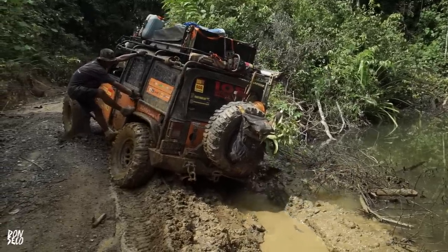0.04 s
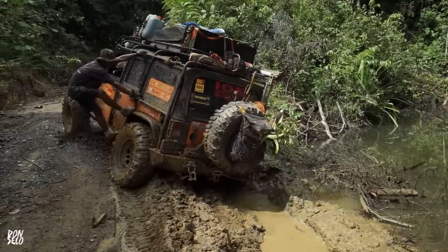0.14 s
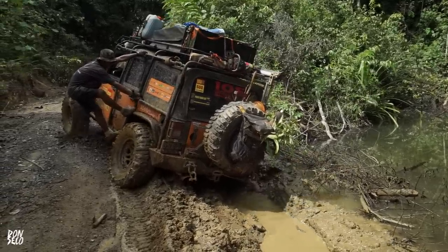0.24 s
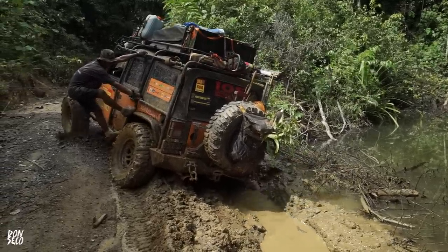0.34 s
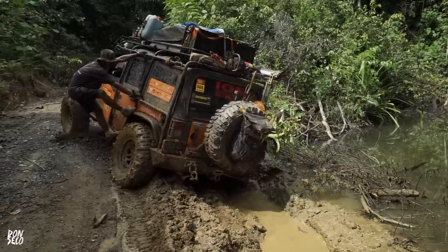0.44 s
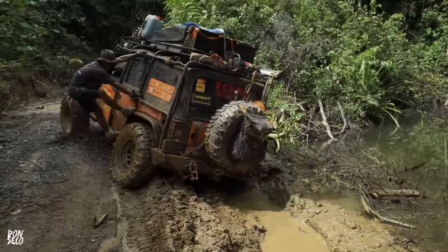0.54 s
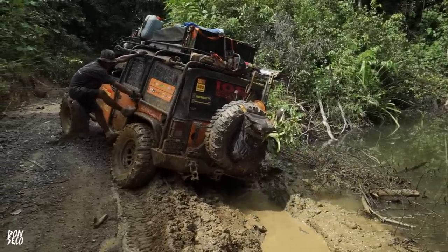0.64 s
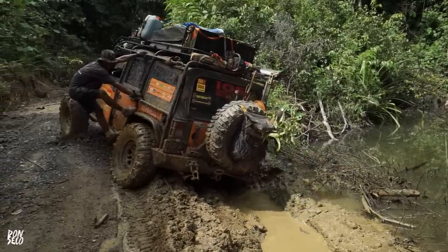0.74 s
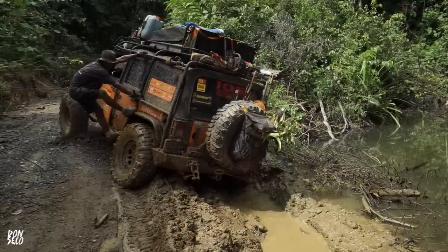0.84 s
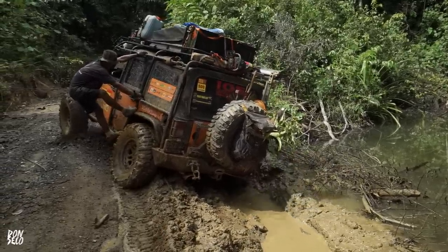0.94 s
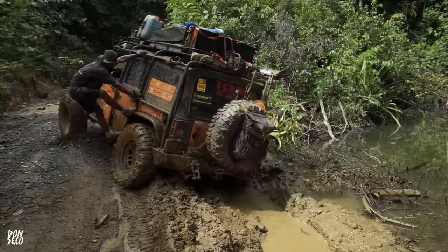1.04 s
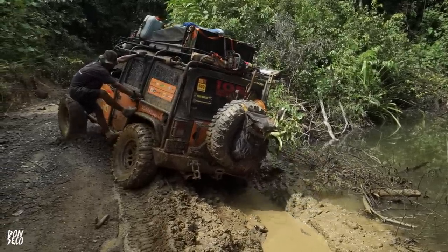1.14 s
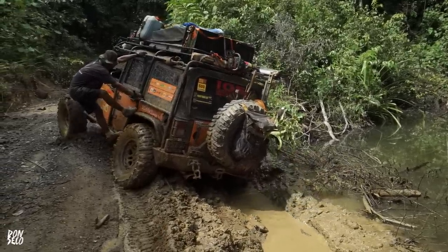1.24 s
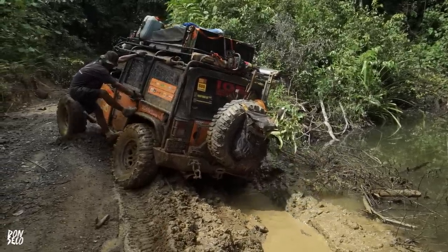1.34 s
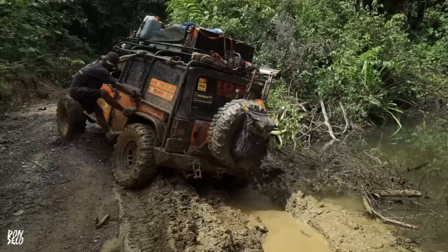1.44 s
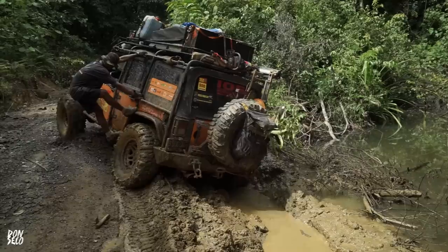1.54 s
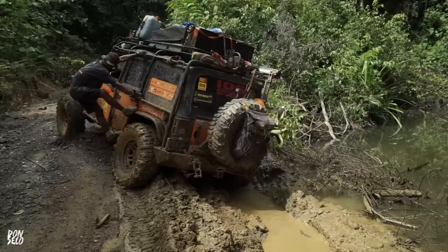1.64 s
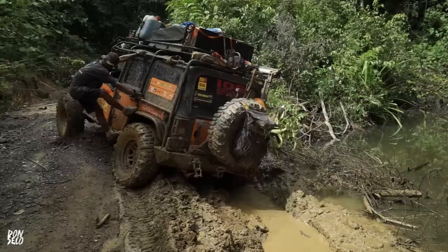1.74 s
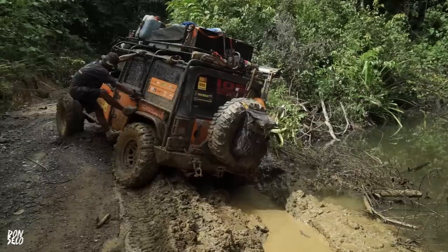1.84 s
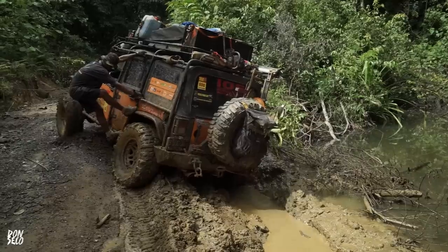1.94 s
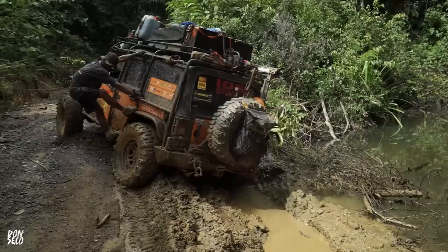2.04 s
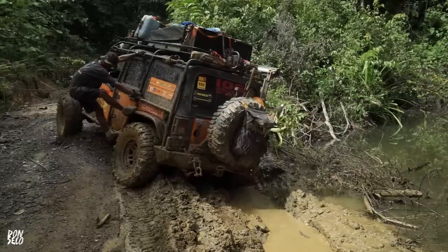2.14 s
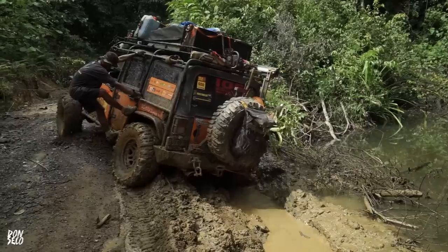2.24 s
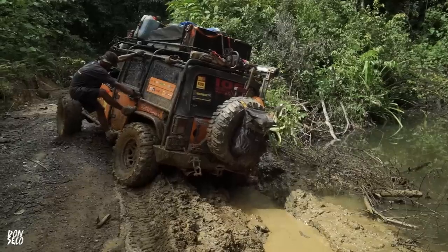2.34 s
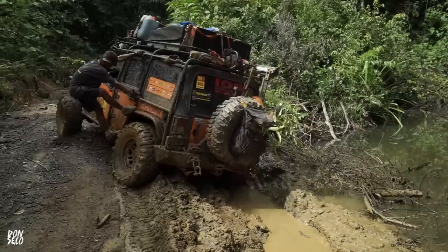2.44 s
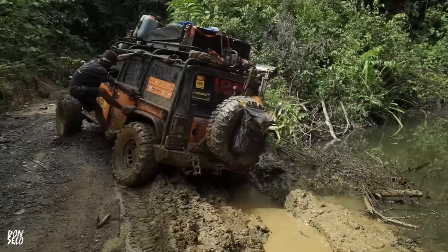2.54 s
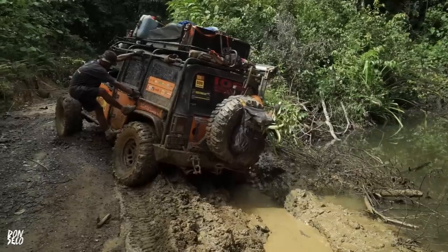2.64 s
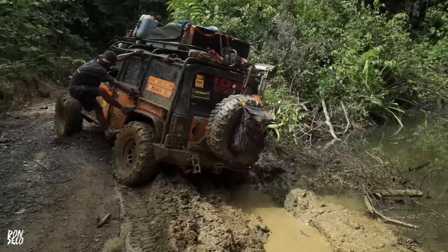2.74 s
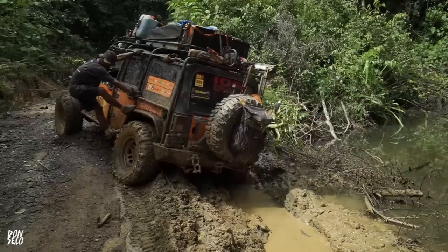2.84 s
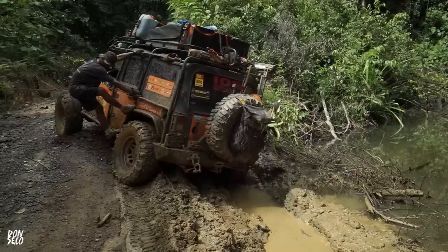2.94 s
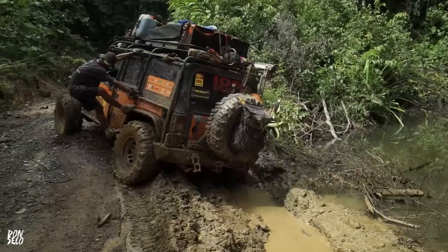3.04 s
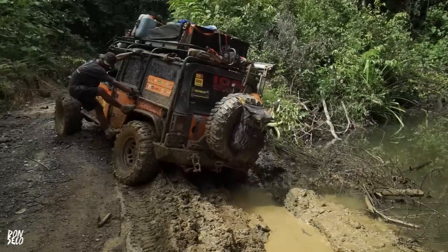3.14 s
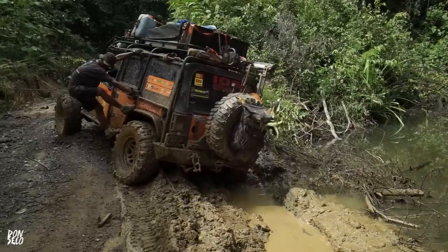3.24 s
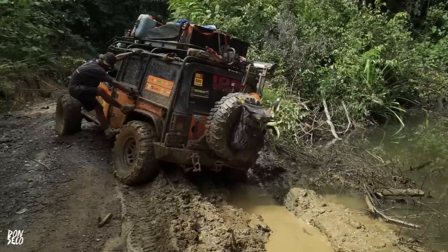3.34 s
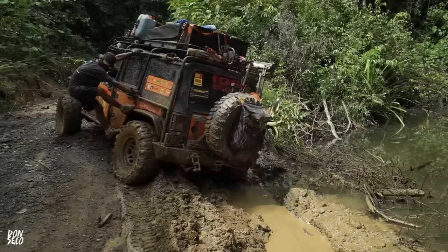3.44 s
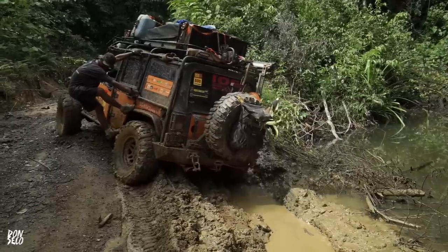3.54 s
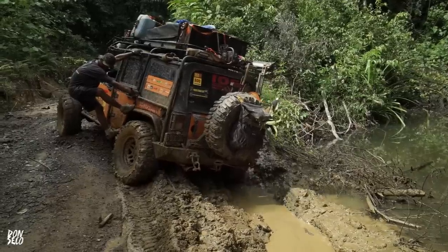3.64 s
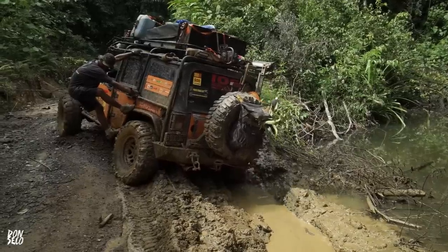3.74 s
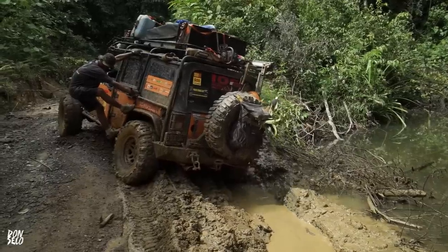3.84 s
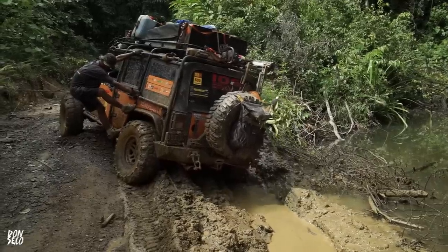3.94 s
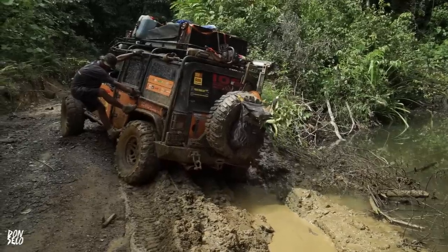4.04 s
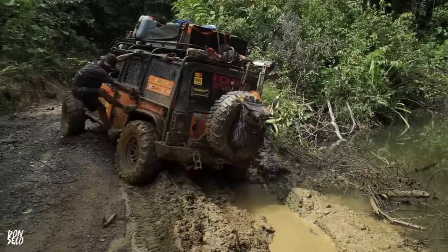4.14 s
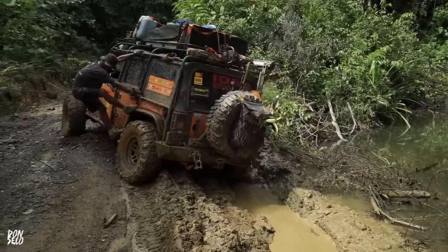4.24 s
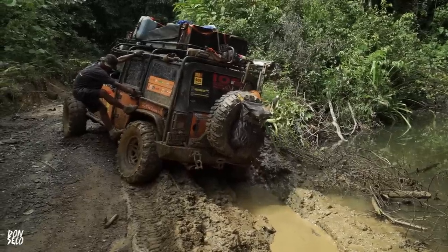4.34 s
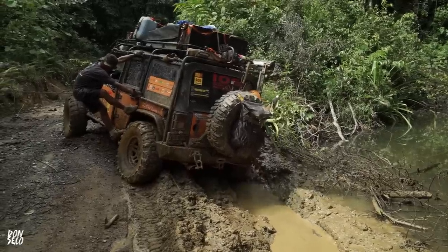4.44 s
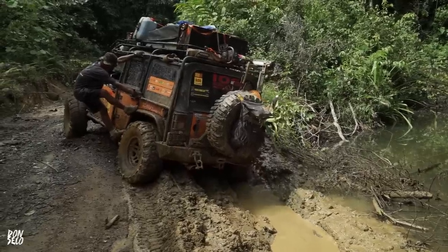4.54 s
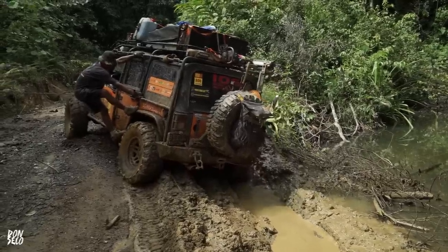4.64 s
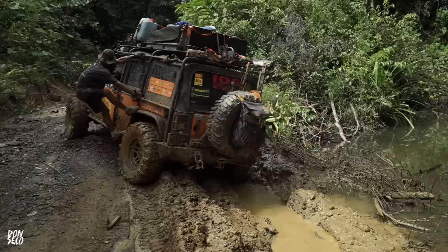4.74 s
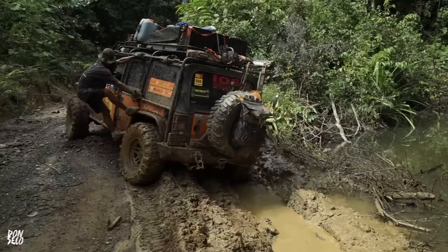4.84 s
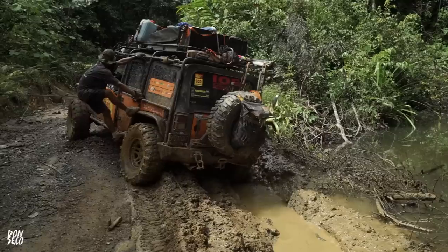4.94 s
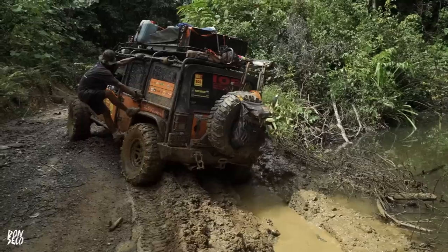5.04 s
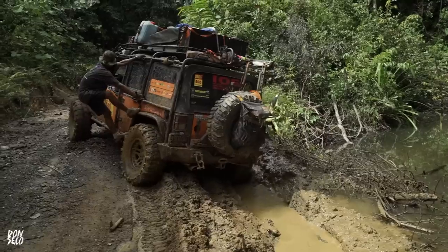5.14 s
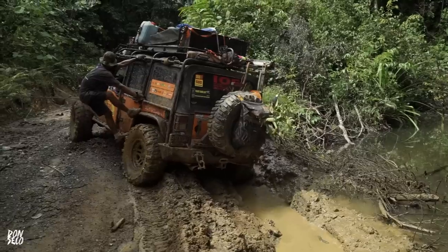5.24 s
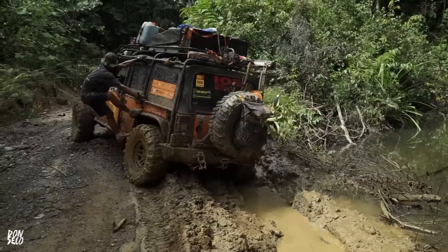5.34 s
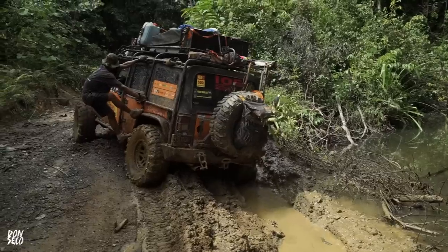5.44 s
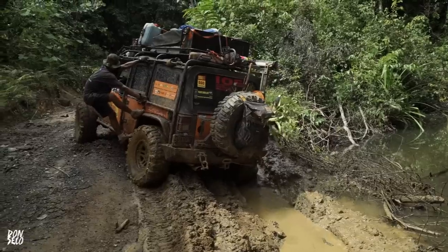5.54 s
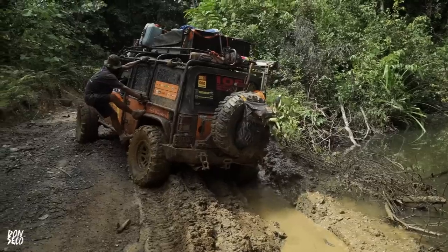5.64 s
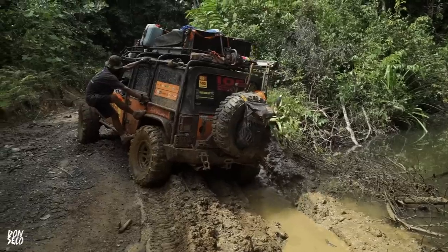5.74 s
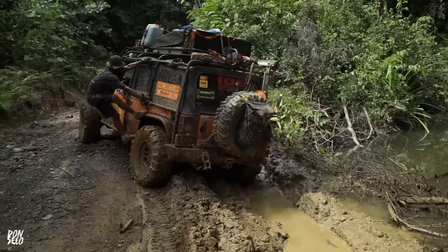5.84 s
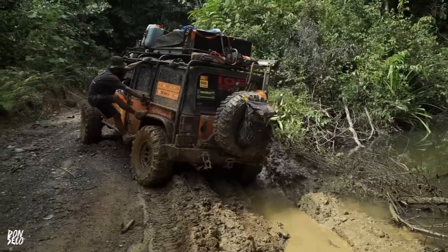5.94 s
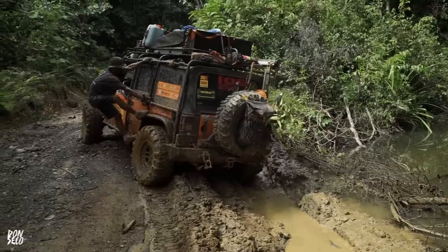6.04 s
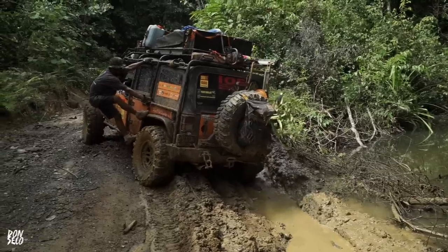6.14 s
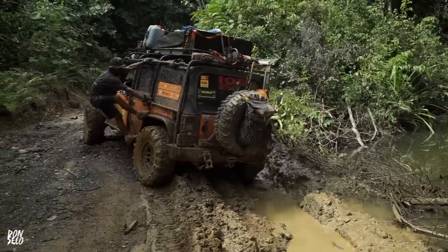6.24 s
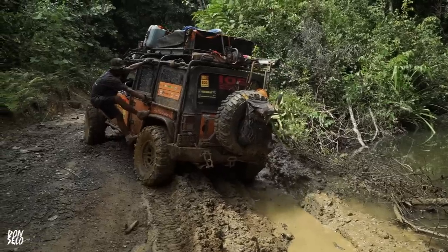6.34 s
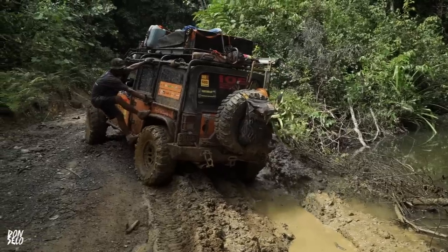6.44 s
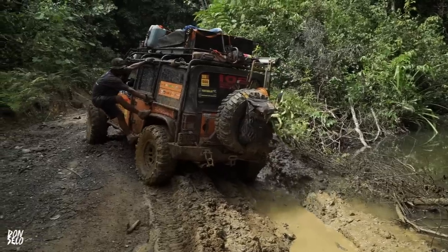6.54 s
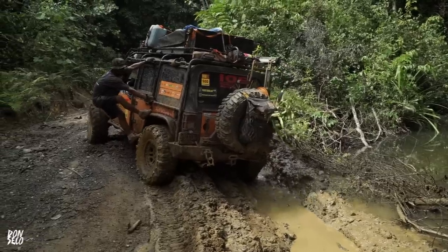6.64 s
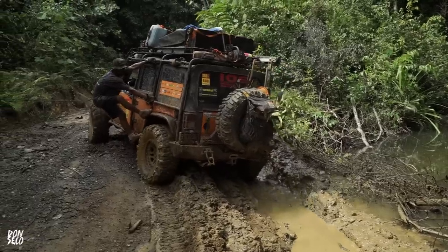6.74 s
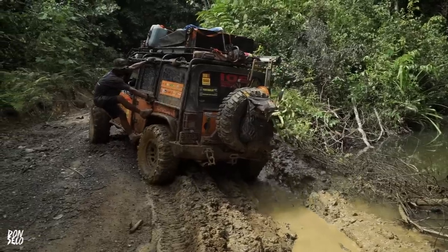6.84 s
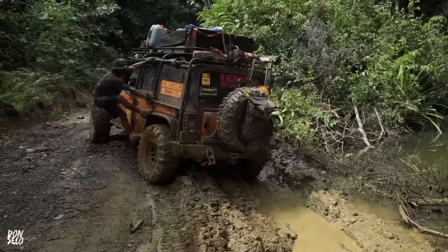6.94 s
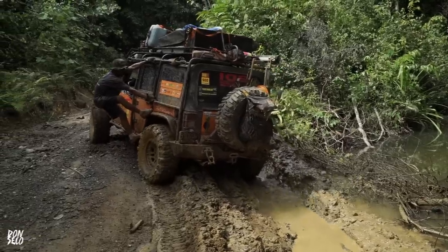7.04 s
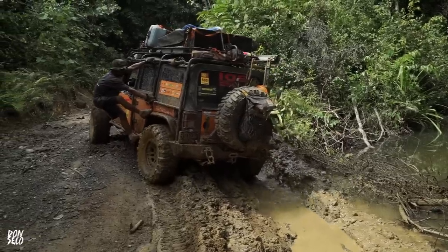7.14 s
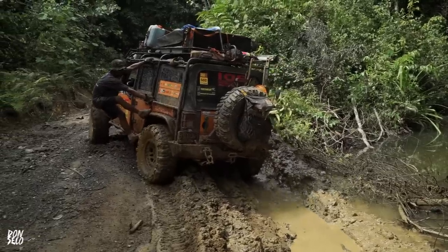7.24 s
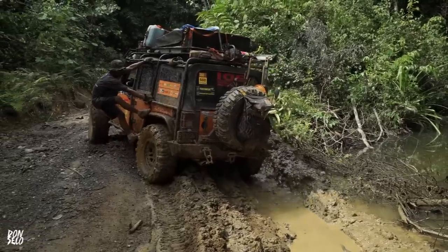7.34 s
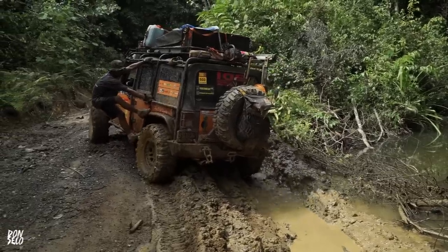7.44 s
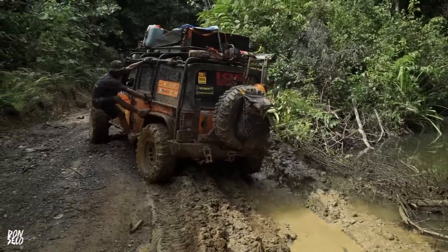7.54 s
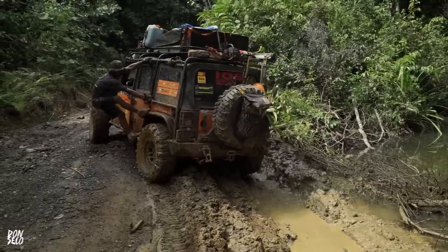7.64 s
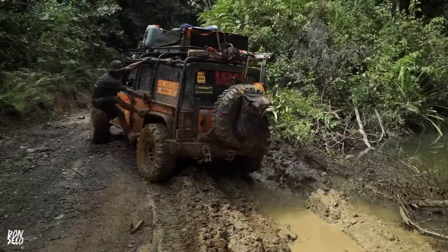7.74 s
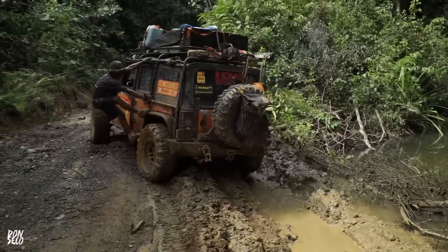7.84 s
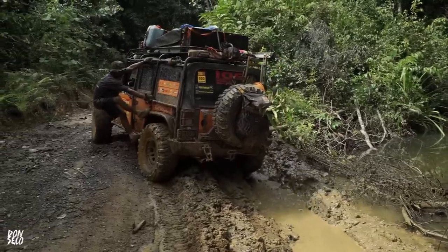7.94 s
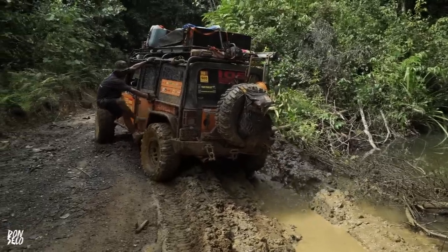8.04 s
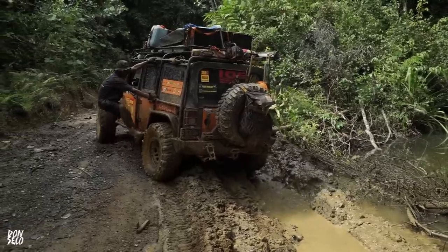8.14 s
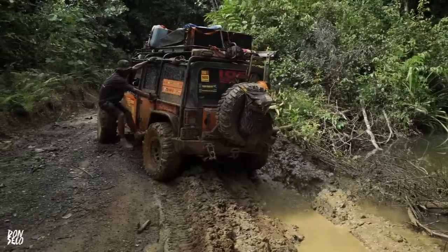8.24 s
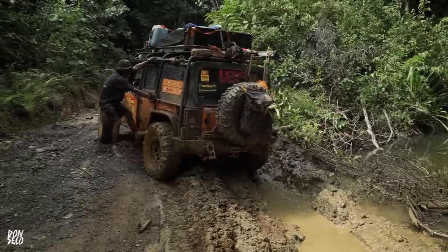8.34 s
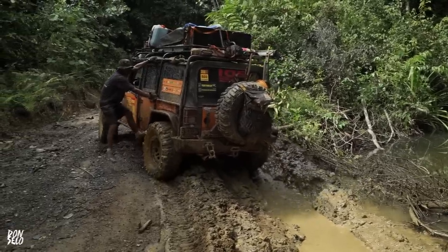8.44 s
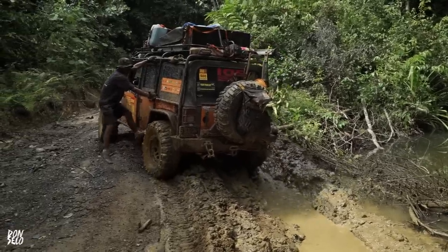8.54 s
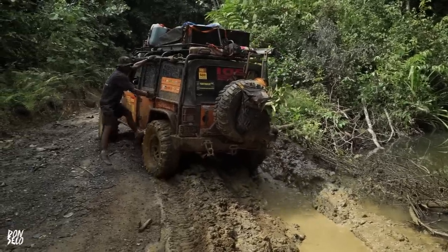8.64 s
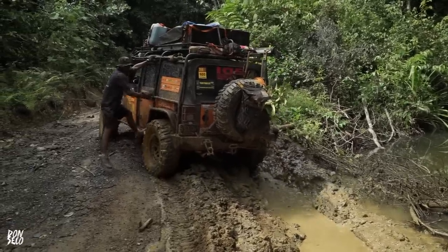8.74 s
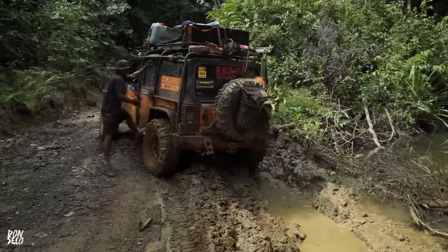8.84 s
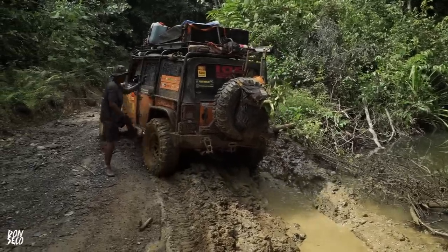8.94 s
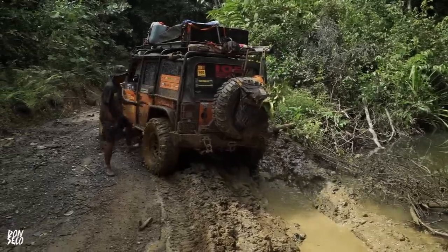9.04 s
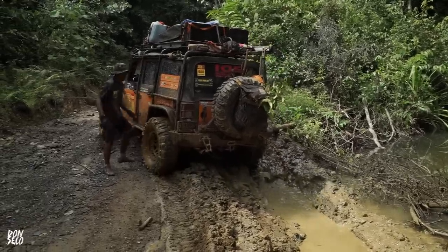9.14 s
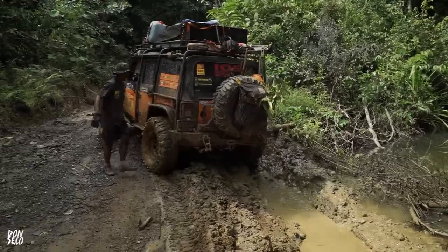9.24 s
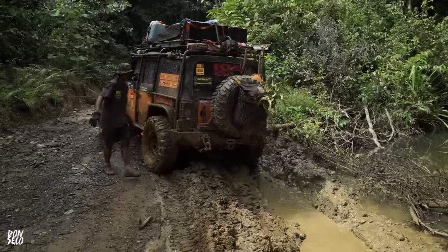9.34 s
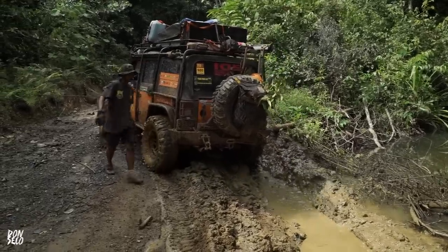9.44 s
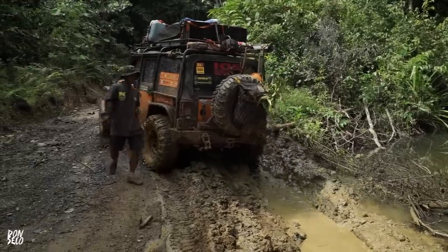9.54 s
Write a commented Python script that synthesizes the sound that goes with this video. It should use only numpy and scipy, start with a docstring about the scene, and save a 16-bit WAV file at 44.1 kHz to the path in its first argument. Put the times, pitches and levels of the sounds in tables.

```python
"""A six-cylinder four-wheel-drive crawls out of a mud rut on a jungle track, heard from behind.
The engine races, sags as the wheels dig in, pulls again and runs down. Its speed and load steer a sum of
sine waves, shaped by the exhaust pipe's resonances, and filtered noise for the rushing gas and a wheeze.
Noise bursts crack as stones and twigs under the tyres, and damped cavities pop as mud.
Something snaps once in two quick cracks, and noise bands make the insects of the forest."""
import sys
import numpy as np
from scipy import signal
from scipy.fft import rfft, irfft, next_fast_len
from scipy.io import wavfile
from scipy.ndimage import uniform_filter1d

SR = 44100
rng = np.random.default_rng(int(sys.argv[2]) if len(sys.argv) > 2 else 0)


def unload_audio(sound):
    """Save the sound as a 16-bit wav file, at the path given as the first command line argument."""
    columns = np.transpose(np.atleast_2d(sound))
    # keep every value between -1 and 1, then stretch to whole-number steps
    steps = np.round(np.clip(columns, -1, 1) * 32767)
    wavfile.write(sys.argv[1], SR, steps.astype(np.int16))


N = 422919
TIME = np.arange(N) / SR  # seconds
FFT_SIZE = next_fast_len(N)

CYLINDERS = 6
CRUISE_HZ = 140  # firings per second at cruising speed
LUGGING_HZ, PULLING_HZ, RACING_HZ = 130, 150, 185  # firings per second
TOP_ORDER = 43  # an order is a whole number of waves per engine cycle
BOOM_PER_LOAD, BARK_PER_LOAD = 0.2, 0.55  # dB per dB of load
BRIGHTEN = 0.47  # rasp tilt under load: dB per octave for each dB of load
PIVOT_HZ = 500  # the pitch where that tilt changes nothing
MUD_RANGE_DB = 11  # from the softest to the loudest small mud pop
EDGE_HZ = 11060  # upper limit of the recorder

# Engine speed over time: start_s, firings_hz
ENGINE_SPEED = [(0.0, 186.0), (0.36, 184.6), (0.84, 169.4), (1.72, 142.5), (2.56, 131.1), (3.12, 135.2),
                (3.99, 128.2), (4.34, 128.9), (4.74, 137.5), (5.7, 146.2), (6.29, 144.7), (7.49, 148.8),
                (7.9, 148.6), (8.2, 143.0), (8.78, 126.6), (8.84, 123.1), (9.22, 112.2), (9.59, 108.3)]
# How hard the engine is loaded over time: start_s, load_db
ENGINE_LOAD = [(0, -2.2), (.6, -4.5), (1.6, -6), (2.3, -2.2), (3.2, -2.3), (4.2, -1.2), (4.8, -1.5),
               (5.8, -6), (7.3, -5), (8.1, -8), (8.7, -7), (9.15, -3.5), (9.58, 0.5)]
# Resonances of the exhaust pipe: pitch_hz, width_hz, level_db
PIPE_RESONANCES = [(57.4, 19, 1), (160.7, 42, -0.5), (312.7, 69, 3), (414.7, 43, 4.5), (544.1, 40.6, 2.5),
                   (585.6, 55, 3.5), (708, 63, -1.6), (787.6, 81, -3.5), (990, 38, -5), (1083, 61, -14.5),
                   (1320, 90, -10)]
# Boom at the firing rate, before load acts: pitch_hz, level_db
BOOM_LEVELS = [(113, -23.5), (122, -18.2), (130, -11.5), (140, -10.5), (149, -10), (160, -7.5),
               (180, -13.5)]
# Bark at twice the firing rate, before load acts: pitch_hz, level_db
BARK_LEVELS = [(220, -25.5), (255, -28), (266, -20), (290, -11.5), (315, -14), (345, -25.5), (370, -23.5)]
# Weak rasp orders, before the pipe: order (waves per engine cycle), level_db
WEAK_ORDERS = [(3, -43.5), (15, -43.5), (27, -43), (38, -49), (43, -54.5)]
# Rasp orders that stand out, before the pipe:
# order (waves per engine cycle), lugging_db, pulling_db, racing_db
STRONG_ORDERS = [(9, -29.5, -31, -49), (13, -34, -39.5, -42.5), (14, -46, -44, -32),
                 (15, -51.5, -40, -29.5), (17, -36.5, -36.5, -29.5), (18, -27, -34, -29),
                 (19, -34, -38, -31.5), (20, -35.5, -54, -33), (23, -39, -30.5, -31), (24, -26.5, -33, -44),
                 (25, -32, -35, -39.5), (26, -30, -33.5, -45), (29, -34.5, -33, -37.5),
                 (30, -33, -40, -28.5), (36, -32.5, -47.5, -41), (37, -33.5, -46.5, -48)]
# How a layer follows the engine, one law each:
# cruising_level_db, per_load (dB per dB of load), per_speed (dB per octave of speed)
RASP_EFFORT = (0, 0.88, 13.1)
# Same columns, for the low rush of gas: cruising_level_db, per_load (dB per dB), per_speed (dB per octave)
RUSH_EFFORT = (-33.5, .2, 13)
# Same columns, for the gas hiss: cruising_level_db, per_load (dB per dB), per_speed (dB per octave)
HISS_EFFORT = (-48.5, 0.42, 8.2)
# Same columns, for the wheeze: cruising_level_db, per_load (dB per dB), per_speed (dB per octave)
WHEEZE_EFFORT = (-60.5, .1, 6)
# Tone colour of the rush of gas: pitch_hz, relative_level_db
RUSH_COLOUR = [(20, -10), (45, -12.5), (130, -4), (300, -0.5), (600, -3.5), (820, -1), (1000, -3),
               (1400, -8.5), (2000, -15.5), (3500, -35)]
# Tone colour of the gas hiss: pitch_hz, relative_level_db
HISS_COLOUR = [(600, -15.5), (1500, 3.5), (2500, 4), (4400, 2), (5200, -0.5), (6100, -7.5), (8000, -2.5),
               (11000, -21)]
# Drifting pitch of the thin wheeze: start_s, pitch_hz
WHEEZE_PITCH = [(0, 3695), (1.6, 2882), (2.6, 4700), (4.1, 4250), (5.8, 4360), (7.6, 3756), (9.58, 3530)]
# Loudest cracks of stones and twigs, before the trims in tyres(): start_s, level_db, pitch_hz
STONE_CRACKS = [(0.125, -26.5, 3570), (0.639, -26, 3410), (2.279, -31, 2640), (2.405, -31, 3320),
                (2.49, -34, 2520), (2.981, -36, 2680), (3.4625, -30.5, 2530), (3.998, -30, 2870),
                (4.0694, -29.5, 2620), (4.5394, -30.5, 2680), (5.001, -30, 3020), (5.1494, -32, 4400),
                (8.0694, -31, 2600)]
# Tone colour of those cracks: pitch_hz, relative_level_db
STONE_COLOUR = [(200, -11), (700, -6), (1500, -2.5), (3000, -5), (5000, -1.5), (8000, 1), (11000, -13)]
# Loudest pockets of mud that burst: start_s, level_db, pitch_hz
MUD_PLOPS = [(2.0837, -33, 1300), (2.2646, -30.5, 1280), (2.373, -28, 1180), (2.851, -31, 1180),
             (3.1512, -34, 1360), (3.7898, -31.5, 1310), (4.2474, -33, 1250), (4.8823, -27.5, 1470),
             (8.239, -35, 1350)]
# Tone colour of the low rumble: pitch_hz, relative_level_db
RUMBLE_COLOUR = [(15, -5.5), (30, -13), (50, -0.5), (75, -3), (110, -8), (250, -24.5), (900, -58.5)]
# Tone colour of the single snap: pitch_hz, relative_level_db
SNAP_TONE = [(250, -5), (800, 9), (1400, 9.5), (1900, 2), (2400, 8), (3500, -3), (5500, -2), (6700, -8.5),
             (8500, -3), (11000, -16)]
# Tone colour of the wash of distant insects: pitch_hz, relative_level_db
FOREST_COLOUR = [(100, -13), (1500, -1.5), (5000, -6), (6300, -6), (7300, 9), (8100, -3), (8900, 4),
                 (9400, -10), (11000, -17.5)]


def exhaust(cycles, firing_hz, flutter=0.16, flutter_hz=7, swell_db=2.78, jitter=0.00066,
            shake=0.035, lag=0.46, spread=0.23, step=12):
    """Firing pulses give the boom and the bark; unequal cylinders fill the orders between, shaped by the pipe.

    jitter, lag and spread are in turns; one point in every `step` samples is computed.
    """
    time, speed = TIME[::step], firing_hz[::step]
    response = pipe()
    load_db = curves(ENGINE_LOAD)[0][::step]
    rasp_gain = effort(RASP_EFFORT)[::step]
    main = {CYLINDERS: amp(read(BOOM_LEVELS, speed) + BOOM_PER_LOAD * load_db),
            2 * CYLINDERS: amp(read(BARK_LEVELS, 2 * speed) + BARK_PER_LOAD * load_db)}
    strong = {round(order): np.interp(speed, [LUGGING_HZ, PULLING_HZ, RACING_HZ], levels)
              for order, *levels in STRONG_ORDERS}
    angle = cycles[::step] + jitter * wander(90, time)  # each firing comes a little early or late
    note = 0
    for order in range(CYLINDERS // 2, TOP_ORDER + 1):
        order_hz = order * speed / CYLINDERS
        gain = np.interp(order_hz, *response)
        phase = order * angle + lag  # the open mouth turns every wave by the same angle
        if order % CYLINDERS:  # the uneven beats are spread over the cycle and never quite repeat
            phase = phase + spread * order ** 2
            unevenness = wander(flutter_hz, time) + 1j * wander(flutter_hz, time)
            gain = gain * (1 + flutter * unevenness)
        if order in main:
            gain = main[order] * gain / abs(gain)  # keeps only the pipe's phase
        else:
            level_db = strong.get(order, np.interp(order, *np.transpose(WEAK_ORDERS)))
            level_db = level_db + BRIGHTEN * load_db * np.log2(order_hz / PIVOT_HZ)
            slow_swell_db = swell_db * wander(0.6, time)
            gain = gain * rasp_gain * amp(level_db + slow_swell_db)
        note = note + np.sqrt(2) * (gain * np.exp(2j * np.pi * phase)).real
    note = note * (1 + shake * wander(7.5, time))
    return signal.resample_poly(note, step, 1, window=("kaiser", 9), padtype="antireflect")[:N]


def pipe(leak_db=-20):
    """Frequencies and complex response of the exhaust pipe: its resonances, and the phase lag they cause."""
    grid = np.fft.fftfreq(SR, 1 / SR)
    power = amp(leak_db) ** 2
    for pitch_hz, width_hz, level_db in PIPE_RESONANCES:
        distance = 2 * (abs(grid) - pitch_hz) / width_hz
        power = power + amp(level_db) ** 2 / (1 + distance ** 2) ** 2
    response = np.exp(np.conj(signal.hilbert(np.log(power) / 2)))  # the loudness curve sets the lag
    return grid[:SR // 2], response[:SR // 2]


def gas(cycles, ring=0.4, chuff=0.22, spit=0.48, knock=0.55):
    """Turbulence leaves the pipe in a puff at every firing; one cylinder blows harder than the rest."""
    every_firing = puffs(CYLINDERS * cycles, 0.74)
    strong_cylinder = puffs(cycles, 0.29)
    chug = (CRUISE_HZ / curves(ENGINE_SPEED)[0]) ** 3  # slow firings stand further apart
    pulsing = 1 + chug * (chuff * every_firing + knock * strong_cylinder)
    turbulence = jet(cycles, repeat=0.37) * pulsing * amp(1.1 * wander(8.5))
    resonances = abs(np.interp(np.fft.rfftfreq(FFT_SIZE, 1 / SR), *pipe())) ** ring
    in_pipe = irfft(rfft(turbulence, FFT_SIZE) * resonances, FFT_SIZE)[:N]
    hiss = jet(cycles, repeat=0.39) * (1 + spit * every_firing) * amp(0.93 * wander(21))
    rush = effort(RUSH_EFFORT) * coloured(in_pipe, RUSH_COLOUR)
    return rush + effort(HISS_EFFORT) * coloured(hiss, HISS_COLOUR)


def jet(cycles, repeat, size=1024):
    """Gas noise with an added part that comes back alike in every engine cycle."""
    pattern = np.interp(cycles % 1, np.arange(size) / size, rng.standard_normal(size))
    return rng.standard_normal(N) + repeat * evened(pattern)


def puffs(turns, width):
    """One soft bump of pressure a turn, of height 1."""
    return np.exp((np.cos(2 * np.pi * turns) - 1) / width ** 2)


def wheeze(cycles, width_hz=380, pulsing=3.9, swell_db=2):
    """A narrow band of hiss that drifts in pitch and pulses with the firings."""
    carrier = np.exp(2j * np.pi * np.cumsum(curves(WHEEZE_PITCH)[0]) / SR)
    band = (wander(width_hz) + 1j * wander(width_hz)) * carrier
    pulsed = band.real * (1 + pulsing * puffs(CYLINDERS * cycles, 0.64))
    return effort(WHEEZE_EFFORT) * evened(pulsed * amp(swell_db * wander(2.2)))


def effort(law):
    """Gain over time of a layer that follows the engine's load and speed."""
    cruising_db, per_load, per_octave = law
    octaves = np.log2(curves(ENGINE_SPEED)[0] / CRUISE_HZ)
    return amp(cruising_db + per_load * curves(ENGINE_LOAD)[0] + per_octave * octaves)


def tyres(cracks_db=-5, ping_db=-7, plops_db=0, grit_db=-52, mud_db=-46, mud_per_load=0.29, rumble_db=-50):
    """Lugs crush stones and twigs and burst wet mud; smaller ticks and pops lie between, over a low rumble."""
    out = amp(rumble_db) * coloured(rng.standard_normal(N), RUMBLE_COLOUR) * amp(2.0 * wander(1.4))
    for start_s, level_db, pitch_hz in STONE_CRACKS:
        add(out, start_s - 0.003, amp(level_db + cracks_db) * crack(0.045, STONE_COLOUR))
        add(out, start_s, amp(level_db + ping_db) * pop(pitch_hz, ring_s=0.052))
    for start_s, level_db, pitch_hz in MUD_PLOPS:
        add(out, start_s, amp(level_db + plops_db) * pop(pitch_hz, ring_s=0.071, width=0.39))
    # small mud pops; the wheels churn harder under load
    for when, size, pitch in rng.random((150, 3)):
        start_s = when * TIME[-1]
        churn_db = mud_per_load * np.interp(start_s, *np.transpose(ENGINE_LOAD))
        level_db = mud_db + churn_db + MUD_RANGE_DB * size ** 3
        add(out, start_s, amp(level_db) * pop(1000 * 2.4 ** pitch, ring_s=0.049))
    # small, higher ticks of grit
    for when, size, pitch in rng.random((260, 3)):
        level_db = grit_db + 13 * size ** 4
        add(out, when * TIME[-1], amp(level_db) * pop(2500 * 3.4 ** pitch, ring_s=0.015))
    return out


def crack(ring_s, colour, tilt_db=0, grit_db=3):
    """A burst of small fractures that falls by 60 dB in ring_s before it is coloured; peak 1."""
    t = np.arange(SR // 4) / SR - 0.004  # a short silence leads in
    fractures = rng.standard_normal(len(t)) * amp(grit_db * rng.standard_normal(len(t)))
    decay = (t > 0) * amp(-60 * abs(t) / max(ring_s, 0.005))
    sound = coloured(fractures * decay, colour, tilt_db)
    return sound / abs(sound).max()


def pop(pitch_hz, ring_s, width=0.38, size=2048):
    """A short spit of noise rings a small damped cavity; peak 1."""
    spit = rng.standard_normal(size) * amp(-60 * TIME[:size] / max(ring_s, 0.004))
    pole = np.exp((2j - np.clip(width, 0.05, 1)) * np.pi * pitch_hz / SR)  # pitch and damping
    cavity = [1, 0, -1], np.poly([pole, np.conj(pole)]).real
    sound = signal.lfilter(*cavity, signal.lfilter(*cavity, spit))  # twice, for steep flanks
    return sound / abs(sound).max()


def snap(start_s=7.289, gap_s=0.0061, first_db=-14, second_db=-21.0, tail_db=-28.5):
    """Something hard gives way under the vehicle in two quick cracks; the trees scatter it back."""
    out = np.zeros(N)
    add(out, start_s, amp(first_db) * crack(0.055, SNAP_TONE))
    add(out, start_s + gap_s, amp(second_db) * crack(0.068, SNAP_TONE))
    add(out, start_s + gap_s, amp(tail_db) * crack(0.5, SNAP_TONE, tilt_db=-0.8))
    return underbody(out, bounce=0.16)


def underbody(x, bounce=0.081, count=8):
    """Early reflections between the chassis and the ground ripple the spectrum."""
    out = x.copy()
    for late_s, sign in zip(rng.uniform(0.0008, 0.012, count), rng.choice([-1, 1], count)):
        add(out, late_s, sign * bounce * x)
    return out / np.sqrt(1 + count * bounce ** 2)


def forest(wash_db=-57, shrill_db=-63, shrill_hz=8545, width_hz=110):
    """A wash of distant insects, and one narrow shrill that wavers."""
    wash = coloured(rng.standard_normal(N), FOREST_COLOUR)
    band = wander(width_hz) + 1j * wander(width_hz)
    shrill = evened((band * np.exp(2j * np.pi * shrill_hz * TIME)).real)
    return amp(wash_db) * wash + amp(shrill_db) * shrill * amp(2.3 * wander(6.7))


def amp(db):
    """Decibels to gain."""
    return 10 ** (np.asarray(db) / 20)


def evened(x):
    """Scales a sound to an average (rms) level of 1."""
    return x / np.sqrt(np.mean(x ** 2) + 1e-20)


def curves(rows):
    """Each column of a table after the first, as a curve over time."""
    start_s, *columns = np.transpose(rows)
    return [np.interp(TIME, start_s, column) for column in columns]


def read(points, hz):
    """Level in dB of a spectrum table at the given frequencies."""
    table_hz, level_db = np.transpose(points)
    return np.interp(np.log(np.maximum(hz, 1)), np.log(table_hz), level_db)


def coloured(x, points, tilt_db=0):
    """Filters x with a spectrum, tilted about 4 kHz by tilt_db per octave; rms 1."""
    size = next_fast_len(len(x))
    hz = np.fft.rfftfreq(size, 1 / SR)
    octaves = np.log2(hz / 4000 + 0.1)  # the offset keeps 0 Hz finite
    gain = amp(read(points, hz) + tilt_db * octaves)
    return evened(irfft(rfft(x, size) * gain, size)[:len(x)])


def wander(rate_hz, time=TIME, size=20000):
    """A random curve of about rms 1, smoothed so that changes faster than rate_hz are weak."""
    hz = np.fft.rfftfreq(size, TIME[-1] / size)
    smooth = evened(irfft(rfft(rng.standard_normal(size)) / (1 + (hz / rate_hz) ** 2)))
    return np.interp(time, np.linspace(0, TIME[-1], size), smooth)


def add(mix, start_s, sound):
    """Mixes a sound in at a time, cut off at the end of the mix."""
    part = mix[round(start_s * SR):][:len(sound)]
    part += sound[:len(part)]


def scene(hunt=0.001012):
    """The crankshaft's slightly unsteady speed drives the firings, the gas puffs and the wheeze."""
    smooth_hz = uniform_filter1d(curves(ENGINE_SPEED)[0], size=2000)
    firing_hz = smooth_hz * (1 + hunt * wander(12))
    cycles = np.cumsum(firing_hz / CYLINDERS) / SR  # every cylinder fires once a cycle
    noises = underbody(gas(cycles) + wheeze(cycles) + tyres())
    return (exhaust(cycles, firing_hz) + noises + snap() + forest())[None]


def record(dry):
    """The recorder's band limit, after very short fades at both ends."""
    faded = dry * signal.windows.tukey(N, 0.0006)
    low_pass = signal.firwin(801, EDGE_HZ, window=("kaiser", 9), fs=SR)
    return signal.oaconvolve(faded, low_pass[None], "same")


dry = scene()
out = record(dry)
unload_audio(out)
```